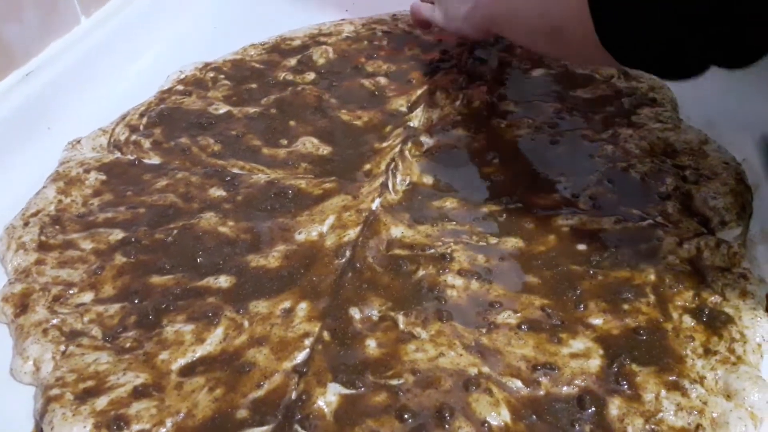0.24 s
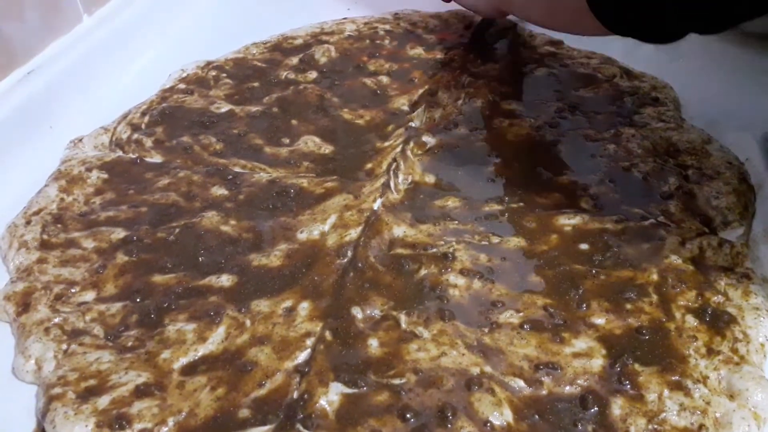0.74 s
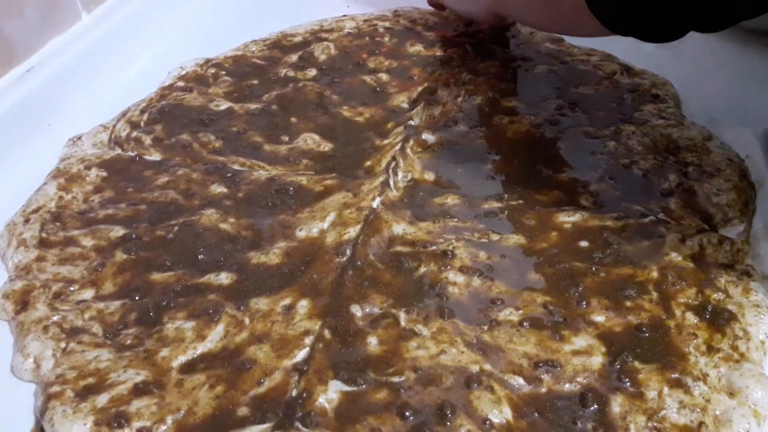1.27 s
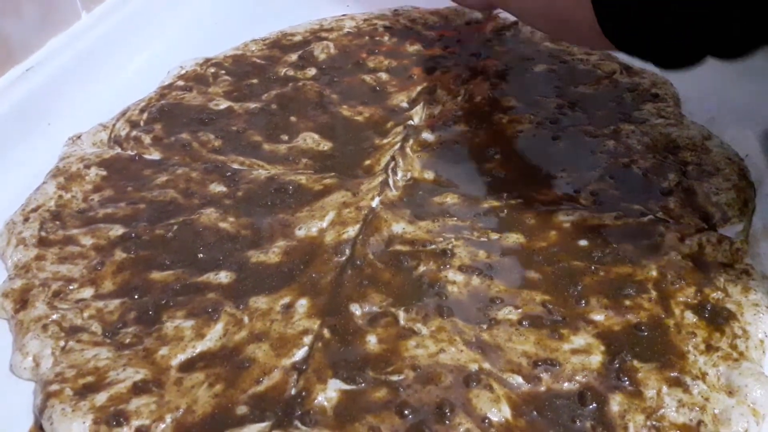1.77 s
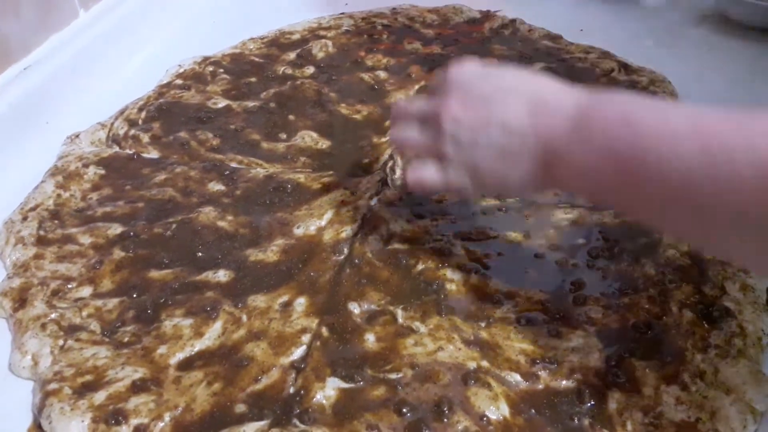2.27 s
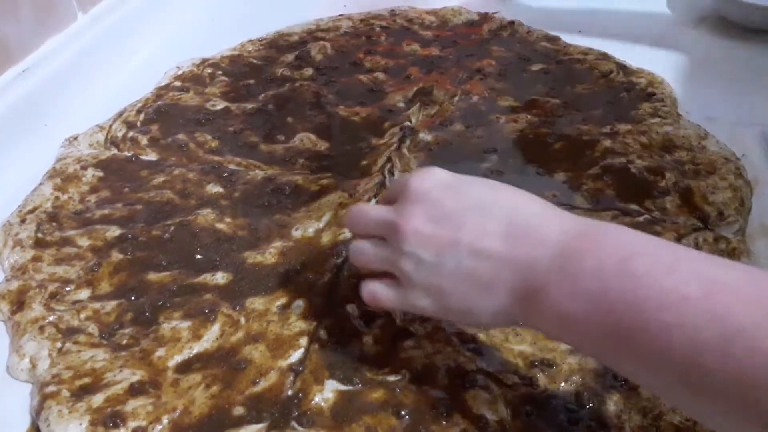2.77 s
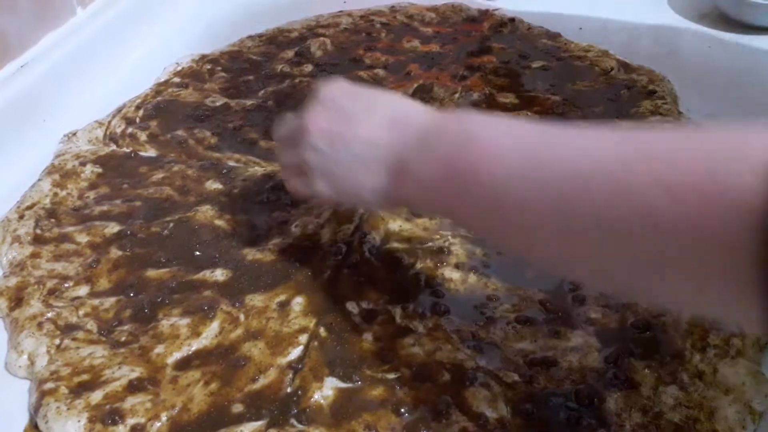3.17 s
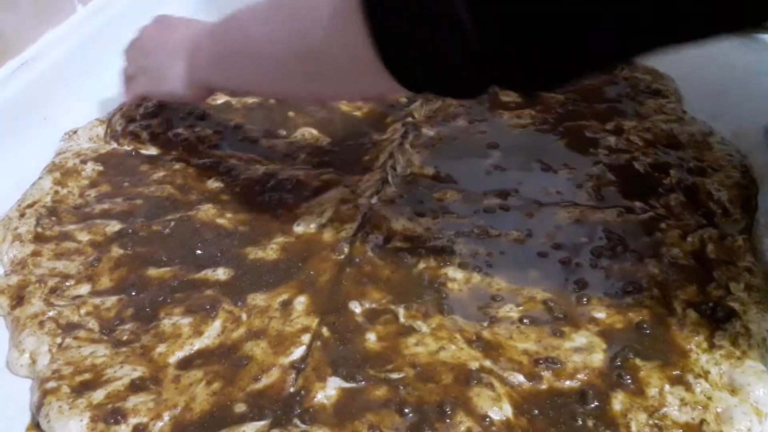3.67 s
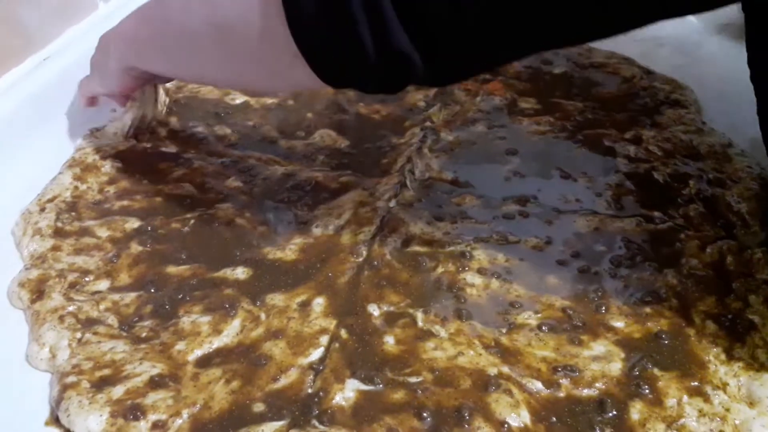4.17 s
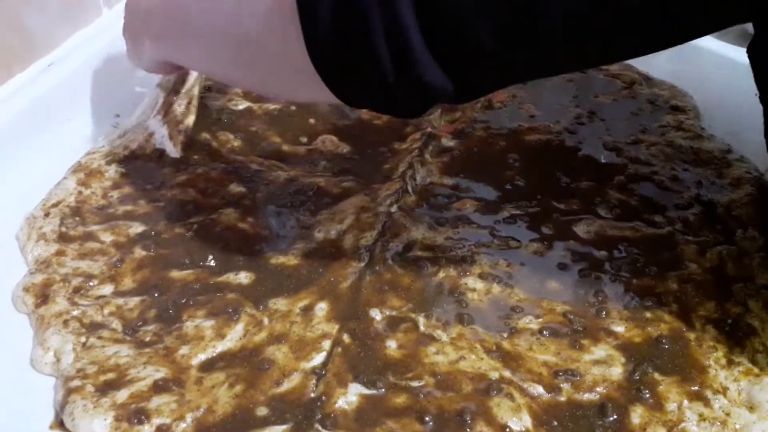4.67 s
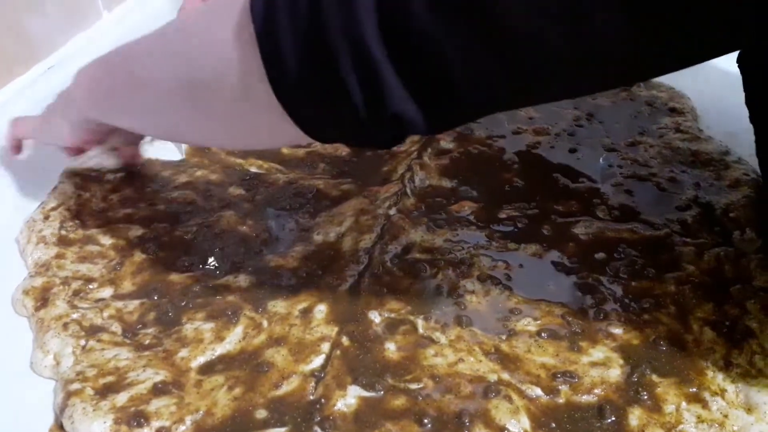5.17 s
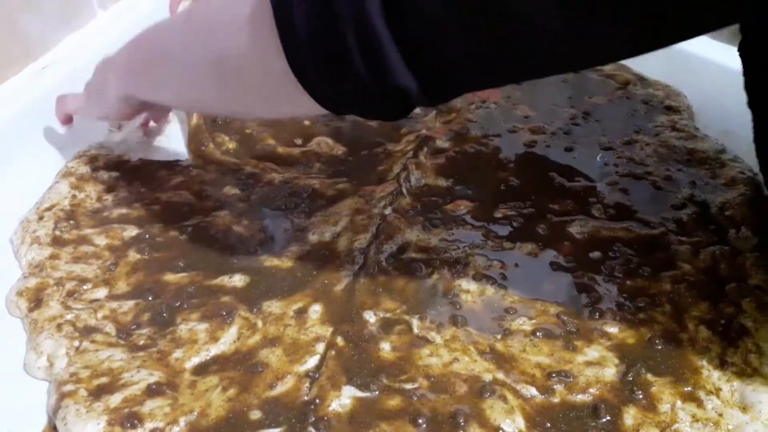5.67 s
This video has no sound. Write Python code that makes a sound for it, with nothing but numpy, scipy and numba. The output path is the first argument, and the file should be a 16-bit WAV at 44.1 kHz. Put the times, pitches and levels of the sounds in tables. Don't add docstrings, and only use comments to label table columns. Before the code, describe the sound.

A small, fairly dry kitchen, heard closely in stereo, with quiet room air and a low appliance hum wavering between two bass tones throughout. From 0 to 1.55 s, fingertips rub filling over dough in about a dozen very short, irregular, woody stick-slip strokes with light cloth hiss; tiny wet snaps cluster near 0.55 s. Mostly hum remains until 2.17 s, when a dish is knocked with a thud, skitters grittily, then clacks loudly at 2.38-2.41 and again, duller, at 2.54, its rattle dying by 2.7. A soft thump comes at 2.87. Around 3.6 a sleeve brushes in a faint airy swell. From 3.8 dough is gripped and peeled: soft thuds, wet tearing and bright sticky snaps, densest at 4.0-4.2 s, then scattered, left-leaning ticks and thin rustle. Muffled knuckle thuds return at 5.0 and 5.67-5.77, with final small ticks until 5.9.

```python
import sys
import numpy as np
from scipy import signal
from scipy.io import wavfile
from scipy.ndimage import uniform_filter1d
from numba import njit

SR = 44100
rng = np.random.default_rng(int(sys.argv[2]) if len(sys.argv) > 2 else 0)


def int16_out(signal):
    q = np.round(np.clip(np.atleast_2d(signal).T, -1, 1) * 32767)
    wavfile.write(sys.argv[1], SR, q.astype(np.int16))


def boost(x):
    u = np.asarray(x, float) / 20
    return 10 ** u


N = 261954
T = np.arange(N) / SR
PORT_HZ = 8300

# full pressure t/s, held t/s, board ring level/dB, upper ring/dB re board, cloth hiss/dB re board
FINGER_STROKES = [(0.0, 0.008, -73, -19, -8), (0.09, 0.034, -59, 5.5, -15.5),
                  (0.24, 0.043, -57.5, -2, -18.5), (0.496, 0.046, -55.5, 0.5, -17),
                  (0.63, 0.024, -74, -1, -12), (0.866, 0.019, -59.5, 1, -10),
                  (0.899, 0.014, -53, -9, -19.5), (0.955, 0.011, -66.5, 7.5, -9),
                  (1.059, 0.031, -62, 5, -9.5), (1.174, 0.0085, -78, 18, -1), (1.224, 0.03, -51, 1.5, -11),
                  (1.373, 0.0085, -54.5, 0.5, -19), (1.425, 0.011, -78, 2, -25),
                  (1.528, 0.029, -60, 4.5, -13.5)]


def unit(x):
    return x / np.sqrt(np.mean(x ** 2) + 1e-30)


def band(x, hz, width):
    return signal.lfilter(*signal.iirpeak(hz, hz / min(width, SR / 4), SR), x)


def between(x, lo_hz, hi_hz):
    return unit(signal.sosfilt(signal.butter(2, [lo_hz, hi_hz], "band", fs=SR, output="sos"), x))


def modes(x, table):
    return sum((-1) ** k * boost(db) * band(x, hz, width) for k, (hz, width, db) in enumerate(table))


@njit
def sweep(x, hz, width):
    y, b, l = np.empty(len(x)), 0., 0.
    for i in range(len(x)):
        g, k = np.tan(np.pi * hz[i] / SR), width / hz[i]
        v = (b + g * (x[i] - l)) / (1 + g * (g + k))
        b, l, y[i] = 2 * v - b, l + 2 * g * v, k * v
    return y


def curves(rows):
    s, first, *rest = np.transpose(rows)
    return [np.interp(T, s, first, -140, -140)] + [np.interp(T, s, c) for c in rest]


def grains(rate, spread_db, size=N):
    chance, sign, big = rng.random(size), rng.standard_normal(size), rng.exponential(size=size)
    return (chance < rate / SR) * sign * boost(spread_db * np.minimum(big, 4))


def walk(rate):
    k = int(SR / rate)
    steps = np.repeat(rng.standard_normal(N // k + 1), k)
    return unit(uniform_filter1d(uniform_filter1d(steps, k), k)[:N])


def add(out, s, sound):
    i = int(s * SR)
    out[..., i:i + sound.shape[-1]] += sound[..., :N - i]


def ports(x, lag):
    return np.array([np.roll(x[0], int(np.round(lag))), x[-1]])


def place(x, lag, pan_db, shade, wet_db):
    t60_s, room_db = 0.19, -1.5
    t = np.arange(int(.6 * SR)) / SR
    tail = rng.standard_normal((2, len(t))) * boost(-60 * t / t60_s) * np.clip(t / 0.00057, 0, 1)
    tail = signal.lfilter([.5], [1, -.5], tail) * boost(room_db + wet_db)
    tail /= np.sqrt(t60_s * SR / 40)
    treble = shade * band(x, 2530, 2200)
    direct = np.array([(x + treble) * boost(pan_db / 2), (x - treble) * boost(-pan_db / 2)])
    return ports(direct, lag) + signal.fftconvolve(x[None], tail, axes=1)[:, :N]


def pair(hz):
    # f/Hz, left-right correlation
    likeness = np.array([(60, 0.91), (250, 0.79), (600, 0.03), (1400, 0.), (16000, 0.13)])
    c = np.interp(np.log(hz), np.log(likeness[:, 0]), likeness[:, 1])
    mid, side = rng.standard_normal((2, N))
    return np.sqrt((1 + c) / 2) * mid + np.sqrt((1 - c) / 2) * side * np.array([[1], [-1]])


def pressure(column, late_s, lift_db_s):
    press_db_s = 424
    out = np.zeros(N)
    for (s, held_s, db, *_), rel_db in zip(FINGER_STROKES, column):
        since = T - s - late_s
        loss_db = np.maximum(-press_db_s * since, lift_db_s * (since - held_s))
        out += boost(db + rel_db - np.maximum(loss_db, 0))
    return out


def rubbing():
    # f/Hz, width/Hz, level/dB
    board_modes = [(720, 260, 10.5), (520, 930, 6), (973.6, 800, -31)]
    # f/Hz, width/Hz, level/dB
    upper_modes = [(1200, 110, 0.5), (1700, 240, -1), (2200, 140, -1.5), (2570, 140, -7.5),
                   (3220, 320, -15)]
    # t/s, upper f/Hz, board f/Hz
    hand_places = [(0.1, 1700, 735), (0.25, 1700, 684), (0.3, 1400, 610), (0.48, 1660, 760),
                   (0.55, 1410, 723), (0.88, 1250, 630), (0.97, 1550, 700), (1.09, 1460, 720),
                   (1.17, 1810, 637), (1.22, 1440, 630), (1.3, 1700, 710), (1.37, 1460, 654),
                   (1.55, 1460, 657)]
    lift_db_s = 308
    db, upper_db, hiss_db = np.transpose(FINGER_STROKES)[2:]
    s, *places = np.transpose(hand_places)
    centre_hz, board_hz = (np.interp(T, s, c) for c in places)
    slips, others = grains(2500, 1.8), grains(2500, 4.2)

    moving = sweep(sweep(others, centre_hz, 340.0), centre_hz, 590.0)
    upper = unit(modes(slips, upper_modes)) + 1.2 * unit(moving)
    upper = between(between(upper, 1110, 3500), 1060, 4200)

    board = unit(sweep(sweep(sweep(slips, board_hz, 250.0), board_hz, 315.0), board_hz, 410.0))
    board = unit(board + 0.23 * between(modes(others, board_modes), 400, 830))

    fibres = grains(9000, 1.3)
    cloth = between(fibres, 3300, 10800) + 0.63 * between(fibres, 14700, 16300)
    cloth = unit(cloth + 0.14 * band(cloth, PORT_HZ, 1800))

    sound = boost(1.5) * pressure(0 * db, 0.0062, lift_db_s) * board
    sound += pressure(upper_db, 0, lift_db_s) * upper
    sound += boost(1.5) * pressure(hiss_db, 0.0051, 203) * cloth
    return place(sound, lag=9.53, pan_db=3.0, shade=0.36, wet_db=-3.5)


def hum():
    # t/s, level/dB, upper over lower/dB
    swell = [(0.0, -62, 0), (0.33, -72.5, 18), (0.54, -63.5, -3), (0.83, -60.5, 7), (1.4, -72.5, 4.5),
             (1.8, -61, -3), (2.06, -67.5, 10), (2.45, -53.5, -10), (2.9, -66.5, 6), (3.02, -67.5, -2),
             (3.5, -63, -3), (4.0, -68, 8), (4.27, -61, 0), (4.45, -69, 8), (5.12, -60.5, -1.5),
             (5.36, -72, 13), (5.76, -65, 11), (5.94, -65, 7)]
    # multiple of the motor rate, rms level/dB
    overtones = [(4, -75.5), (5, -83.5), (7, -83.5), (12, -82.5)]
    # f/Hz, width/Hz, rms level/dB
    fan_modes = [(54.6, 7.2, -71), (286.6, 15.4, -69.5), (252.5, 15, -74.5), (337.4, 8.5, -83),
                 (395, 7.1, -81.5), (693, 15, -80), (1156, 160, -86), (2020, 340, -82.5),
                 (4368, 160, -83.5), (8300, 590, -80.5)]
    out, (level_db, tip_db) = 0, curves(swell)
    drones = [(99.8, 2.46, level_db - tip_db / 2), (146.7, 4.886, level_db + tip_db / 2)]  # f/Hz, wander/Hz, level/dB
    for hz, wander_hz, db in drones:
        turn = np.cumsum(hz + wander_hz * walk(14)) / SR
        out = out + boost(db + 3 + 3.5 * walk(14)) * np.sin(2 * np.pi * turn)

    motor_hz = 98.1
    turn = np.cumsum(motor_hz + 0.3987 * walk(9)) / SR
    load_db = -3.5 * np.clip(1 - T / 2.8, 0, 1)
    for k, db in overtones:
        out = out + boost(db + 3.5 + load_db + 2.6 * walk(8.2)) * np.sin(2 * np.pi * k * turn)

    for hz, width, db in fan_modes:
        fan = unit(band(band(pair(hz), hz, width), hz, 2 * width))
        out = out + boost(db + 1.43 * walk(5.5)) * fan
    return ports(out * boost(np.array([[1.1], [-1.1]])), lag=-10)


def air():
    # f/Hz, level/dB per Hz
    spectrum = np.array([(15, -45), (25, -23.5), (141, -3.5), (206, -23.5), (285, -16), (405, -19.5),
                         (439, -15), (695, -30), (911, -27), (1160, -32.5), (3520, -35.5), (4250, -40),
                         (6560, -40), (8360, -38), (12500, -41.5), (16000, -41)])
    out = 0
    for hz in 30.5 * 2 ** np.arange(0, 9.3, 1 / 3):
        db = np.interp(np.log(hz), np.log(spectrum[:, 0]), spectrum[:, 1]) + walk(6.8)
        out = out + boost(db) * band(band(pair(hz), hz, hz / 3), hz, hz / 3)
    return boost(-64) * unit(out)


def dough():
    # t/s, peak level/dB, f/Hz, lower part/dB re peak
    filling_snaps = [(0.536, -53, 8100, 2), (0.5406, -42, 6360, -13), (0.545, -47.5, 8030, -3),
                     (0.554, -44, 6700, -12), (0.8695, -51, 8093, -23), (0.95, -58, 8300, -16),
                     (1.205, -55, 8300, -20), (1.3844, -49, 10000, -22), (3.8897, -53, 8190, -15),
                     (4.0676, -36.5, 6310, -26), (4.081, -35, 8260, -11), (4.1054, -46, 8550, -6),
                     (5.6676, -53, 6400, -7), (5.6921, -54, 8550, -19)]
    # t/s, peak level/dB, left minus right/dB, airy part/dB re peak
    dry_ticks = [(3.9765, -54, 7, -4), (4.001, -40, 10, -10), (4.0317, -43, 8, -7), (4.1263, -35.5, 3, -10),
                 (4.1616, -45, 3, -3), (4.217, -39.5, 5.5, 0), (4.3356, -53, 8, 2), (4.3447, -50.5, 9, 0),
                 (4.4285, -62, 5, 6), (4.438, -62, 4, 6), (4.456, -59, 1, 12), (4.4925, -57, 8, -6),
                 (4.53, -41.5, 9, -8), (4.5455, -50, 6, -10), (4.6426, -47.5, 9.5, -3),
                 (4.667, -48.5, 0, 2), (4.6992, -39, 8, -7), (4.8186, -54.5, 10, -7), (4.8545, -56.5, 7, 0),
                 (5.0456, -57, 8, -5), (5.0692, -53, 11, 5), (5.1147, -52.5, 13, -10),
                 (5.167, -47.5, 7, -7), (5.182, -50, 10, 2), (5.186, -46.5, 13, -6), (5.217, -49, 9, -9),
                 (5.226, -46.5, 10, -10), (5.313, -56, 10, -3), (5.403, -58, 1, 7), (5.7535, -62, 3, -2),
                 (5.8004, -69, 2, 0), (5.839, -50, 15, -3), (5.8569, -51, 7, 0), (5.9138, -49, 16, -2)]
    # t/s, length/s, centre f/Hz, width/Hz, level/dB
    tears = [(3.803, .045, 650, 400, -65.5), (3.862, 0.18, 595, 298, -63), (3.906, 0.061, 1910, 1200, -65),
             (3.975, 0.095, 520, 350, -53), (3.97, 0.046, 1900, 700, -63), (3.976, 0.088, 4500, 1200, -63),
             (4.013, .03, 14000, 3000, -60), (4.02, 0.05, 2120, 900, -59.5),
             (4.08, 0.022, 3040, 600, -54.5), (4.103, 0.016, 3100, 800, -56),
             (4.119, 0.022, 2700, 590, -64), (4.149, 0.1, 1540, 600, -63), (4.342, 0.035, 11000, 7000, -64),
             (4.427, .05, 14000, 3500, -69), (4.67, 0.025, 13000, 5000, -64),
             (4.995, 0.072, 605, 497, -61.5), (4.996, 0.08, 2200, 1200, -72.5),
             (5.066, 0.019, 12500, 6000, -59), (5.088, 0.058, 12500, 6000, -72),
             (5.183, 0.083, 10000, 5000, -63.5), (5.666, 0.073, 1890, 1410, -63),
             (5.667, 0.083, 454, 350, -56.5), (5.668, 0.03, 760, 200, -52),
             (5.837, 0.12, 9000, 6000, -66.5)]
    # t/s, rustle level/dB
    effort = [
        (3.8, -85),
        (3.94, -73),
        (4.13, -66),
        (4.27, -78.5),
        (4.67, -78),
        (4.86, -82.5),
        (5.24, -75.5),
        (5.46, -90),
        (5.94, -83),
    ]
    out, t = np.zeros((2, N)), np.arange(int(.05 * SR)) / SR
    snaps = [(s, db, hz, lower_db, -11, 4.5) for s, db, hz, lower_db in filling_snaps]
    snaps += [(s, db, PORT_HZ + 130 * rng.standard_normal(), -24.5, airy_db, pan_db)
              for s, db, pan_db, airy_db in dry_ticks]
    for s, db, pitch_hz, lower_db, airy_db, pan_db in snaps:
        decay = np.exp(-t / 0.022) + 4 * np.exp(-t / 0.0018)
        snap = signal.unit_impulse(len(t)) + 0.036 * rng.standard_normal((2, len(t))) * decay
        parts = [(band(band(snap, pitch_hz, 1060), pitch_hz, 5300), 0),
                 (between(snap, 2600, 3600), lower_db),
                 (between(snap, 11300, 21000), airy_db)]
        tick = sum(boost(rel) * p / np.abs(p).max() for p, rel in parts)
        add(out, s, boost(db + np.array([[pan_db], [-pan_db]]) / 2) * tick)

    for s, length, hz, width, db in tears:
        n = int(length * SR)
        tear = np.array([grains(1500 + .6 * hz, 2.0, size=8192)[:n] for _ in range(2)])
        tear = unit(band(band(tear, hz, width), hz, 2 * width))
        add(out, s, boost(db) * tear * np.sin(np.pi * (np.arange(n) / n) ** 0.37))

    effort_db = curves(effort)[0]
    peeling = T > effort[0][0]
    dull_db = -84 + 1.55 * (effort_db + 78.0)
    thin_db = -76.5 + effort_db + 77.0
    patches = boost(0.95 * np.clip(walk(40), -2, 1.5)) * peeling
    for side, pan_db in enumerate((1.5, -1.5)):
        crackle = grains(6000, 2.4) * patches
        out[side] += boost(effort_db + pan_db) * between(crackle, 7400, 9300)
        out[side] += boost(dull_db + pan_db) * between(crackle, 1400, 6000)
        out[side] += boost(thin_db) * between(crackle, 11000, 18700) * peeling
    return ports(out, lag=-11.5)


def dish():
    # t/s, peak level/dB, grit/dB re peak (high when the rim strikes, low when the base lands flat)
    bounces = [(2.171, -43, 9), (2.182, -38, -1.5), (2.204, -43, -8), (2.271, -43.5, -3.5),
               (2.287, -52, -20), (2.305, -41, -16), (2.319, -43, -24), (2.336, -55.5, -6),
               (2.384, -22, -38), (2.392, -28.5, -30), (2.405, -21, -35.5), (2.414, -29, -27),
               (2.424, -35, -26), (2.439, -39.5, -23), (2.453, -49, -30), (2.475, -43.5, -35),
               (2.53, -32.5, -85), (2.542, -23.5, -51), (2.554, -34.5, -52), (2.569, -34.5, -50),
               (2.584, -43.5, -54), (2.61, -47, -43), (2.642, -52, -24), (2.685, -70, -24)]
    # f/Hz, width/Hz, first landing level/dB, second landing level/dB
    dish_modes = [(350, 16, -19, -16), (480.4, 30, -2, -10.5), (630, 16, -4, -26), (704, 33, 0.5, -4),
                  (811, 29, 2.5, -4.5), (860, 37, -8.5, -3), (1110, 62, 2, -7), (1145, 42, -3, -2),
                  (1215, 46, -2, -4), (1450, 90, -8.5, -12), (1630, 97, -7, -10), (1840, 83, -3.5, -2),
                  (1960, 78, -3, -2), (2260, 79, -11.5, -10.5)]
    # t/s, level/dB
    slide = [
        (2.17, -63),
        (2.184, -53),
        (2.252, -68),
        (2.312, -50.5),
        (2.356, -70.5),
        (2.375, -41),
    ]
    # f/Hz, width/Hz, level/dB
    rim_modes = [(910, 300, -1), (1250, 140, 3), (1770, 100, 3), (2770, 72, -0.5)]
    second_landing_s = 2.5
    out, grit, t = np.zeros(N), np.zeros((2, N)), np.arange(int(.25 * SR)) / SR
    for s, db, grit_db in bounces:
        contact_hz = min(3400 * 2 ** ((grit_db + 35.0) / 35), 4500)
        soft = signal.butter(3, contact_hz, fs=SR, output="sos")
        push = rng.standard_normal(len(t)) * np.exp(-t / 0.0011)
        landing = [(hz, width, second if s > second_landing_s else first)
                   for hz, width, first, second in dish_modes]
        ring = signal.sosfilt(soft, modes(push, landing))
        body = band(band(push, 335, 190), 350, 280)
        edge = band(band(band(push, 2740, 202.3), 2570, 550), 2500, 1200)
        parts = [(ring, 0), (body, 0.42 * grit_db), (edge, -6.5 + 0.45 * grit_db)]
        add(out, s, sum(boost(db + rel) * p / np.abs(p).max() for p, rel in parts))

        spray_hz = np.clip(14700 * 2 ** (grit_db / 25.5), 4000, 16000)
        hiss = between(rng.standard_normal((2, len(t))), 2600, spray_hz)
        hiss = hiss * (np.exp(-t / 0.0028) + 1.09 * np.exp(-t / 0.025))
        add(grit, s, boost(db + grit_db - 8.0 + np.array([[1.5], [-1.5]])) * hiss)
    scrape = boost(curves(slide)[0] + 1.0) * unit(modes(grains(1100, 5.0), rim_modes))
    grit += 0.23 * band(grit, 11000, 5000) * np.array([[-1], [1]])
    grit += boost(-13.0) * band(grit, PORT_HZ, 1382)
    return place(out + scrape, lag=10.5, pan_db=-3.5, shade=0.68, wet_db=-4.5) + grit


def thuds():
    # t/s, peak level/dB, slap/dB re peak, ring t60/s, f/Hz
    blows = [(2.171, -34.5, -9, 0.25, 95), (2.19, -46.5, -10, 0.62, 285), (2.269, -37.5, -6.5, 0.21, 142.9),
             (2.384, -32.5, 1.5, 0.3, 109), (2.409, -47, 11.5, 0.28, 100), (2.541, -36, 0, 0.35, 133),
             (2.678, -48.5, -3.5, 0.48, 151), (2.865, -45.5, -32, 0.5, 139), (3.805, -37.5, -22, 0.16, 158),
             (3.817, -46.5, -32, 0.985, 88), (3.957, -39.5, -23, 0.11, 157), (3.986, -34.5, -18, 0.16, 154),
             (4.049, -41.5, -17.5, 0.21, 127), (4.995, -38.5, -26.5, 0.19, 146),
             (5.668, -37, -13.5, 0.11, 163), (5.686, -32, -14, 0.12, 170), (5.71, -41, -20, 0.39, 119),
             (5.768, -45.5, -23, 0.24, 137)]
    # f/Hz, t60/s, level/dB
    table_modes = [(73.996, 0.49, -4), (100.3, 0.39, 1.5), (145.8, 0.27, 6), (165.7, 0.44, -7),
                   (279.6, 0.29, -4.5), (353, 0.24, -5.5)]
    out, t = np.zeros(N), np.arange(int(.7 * SR)) / SR
    for s, db, slap_db, ring_s, pitch_hz in blows:
        low = 0
        for hz, t60, g in table_modes:
            mistuned_db = 4.4 * np.log2(hz / pitch_hz) ** 2
            decay_db = 60 * t / (t60 * ring_s / 0.35)
            low = low + boost(g - mistuned_db - decay_db) * np.sin(2 * np.pi * hz * t)
        low = low * np.clip(t / 0.013, 0, 1)
        slap = between(between(rng.standard_normal(len(t)), 243, 3600), 174, 990) * np.exp(-t / 0.041)
        add(out, s, boost(db) * (low / np.abs(low).max() + boost(slap_db - 6.5) * slap))
    return place(out, lag=-9.0, pan_db=0.5, shade=0.16, wet_db=-15.5)


def sleeve():
    centre_s, length_s, hz, width_hz = 3.63, 0.42, 9000, 3100
    hiss = band(band(rng.standard_normal((2, N)), hz, width_hz), hz, 2 * width_hz)
    return boost(-72.5 - 20 * ((T - centre_s) / length_s) ** 2) * unit(hiss)


def scene():
    near = rubbing() + dish() + thuds()
    near = near + boost(2) * band(near, PORT_HZ, 290)
    return near + dough() + hum() + air() + sleeve()


def low_pass(x):
    return signal.sosfilt(signal.butter(12, 16400, fs=SR, output="sos"), x)


def record(dry):
    trimmed = signal.sosfilt(signal.butter(3, 39, "high", fs=SR, output="sos"), dry)
    trimmed = trimmed + boost(-16) * band(trimmed, 15400, 400)
    trimmed = signal.sosfilt(signal.ellip(10, .2, 80, 15850, fs=SR, output="sos"), trimmed)
    return low_pass(trimmed)


dry = scene()
out = record(dry)
int16_out(out)
```